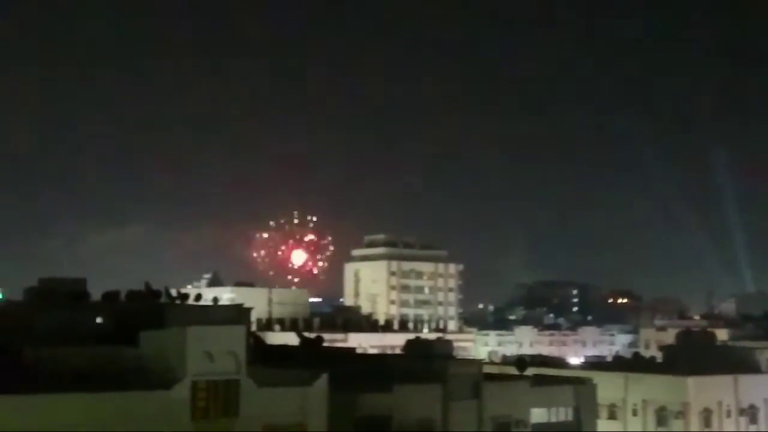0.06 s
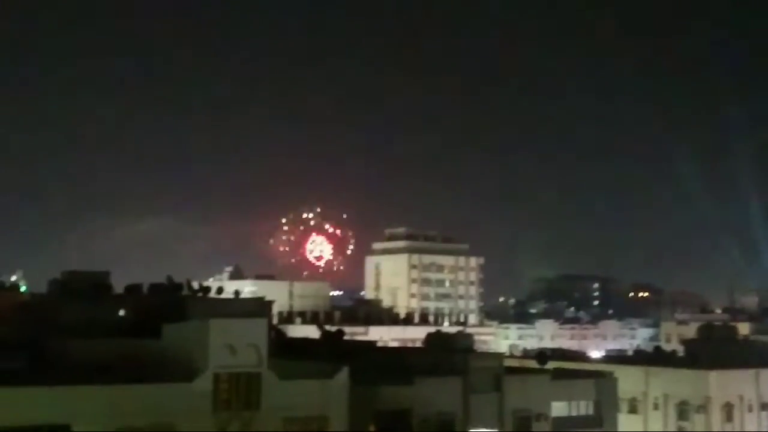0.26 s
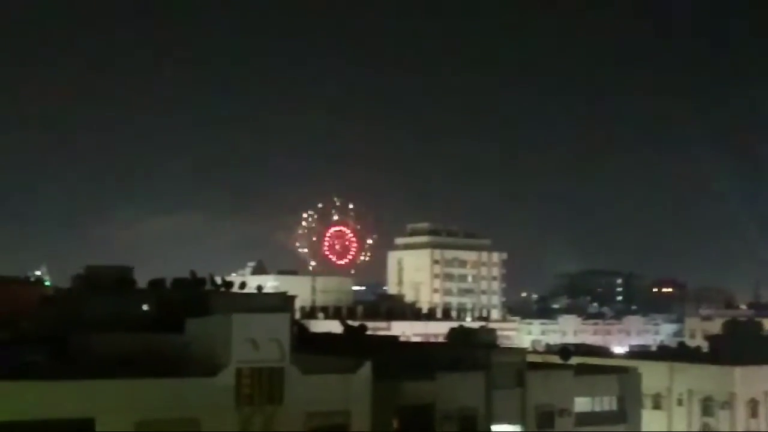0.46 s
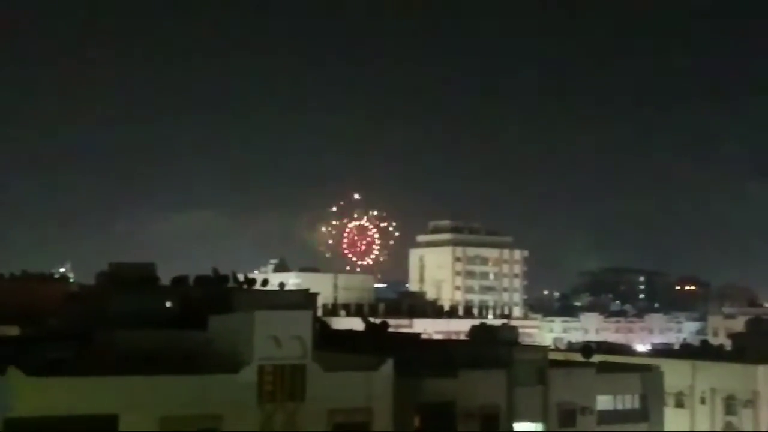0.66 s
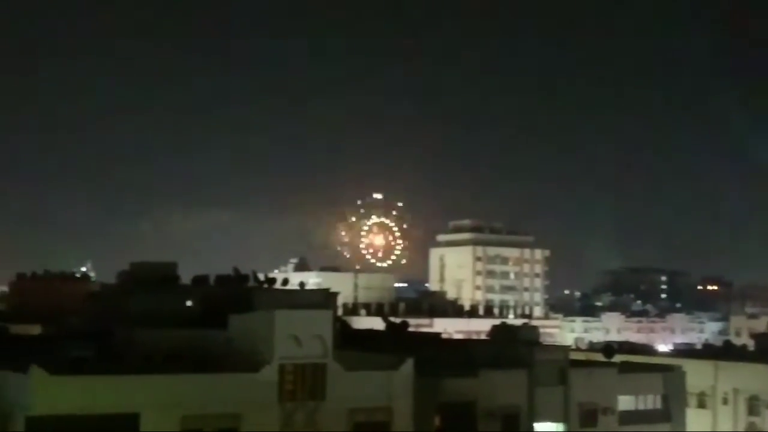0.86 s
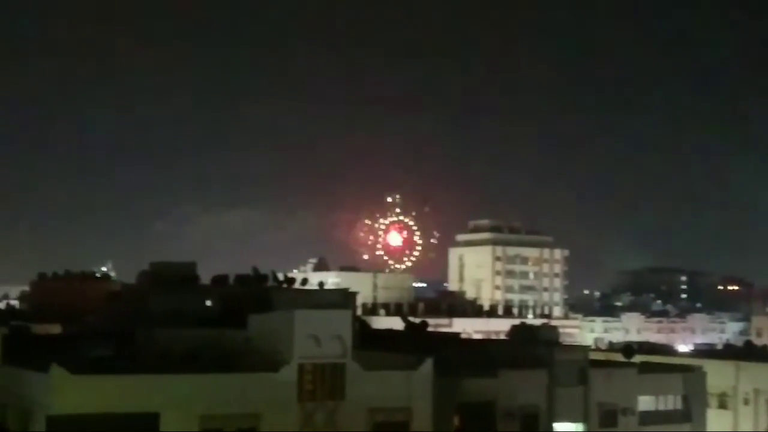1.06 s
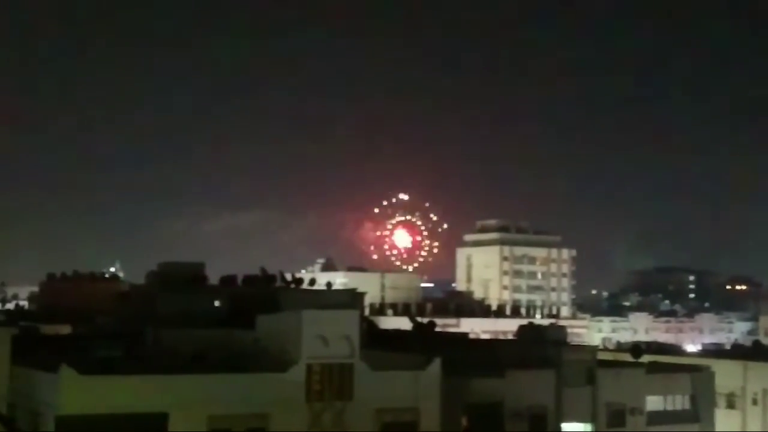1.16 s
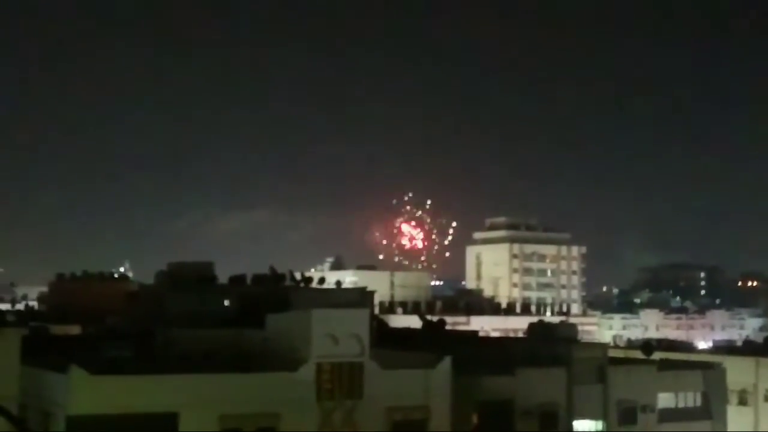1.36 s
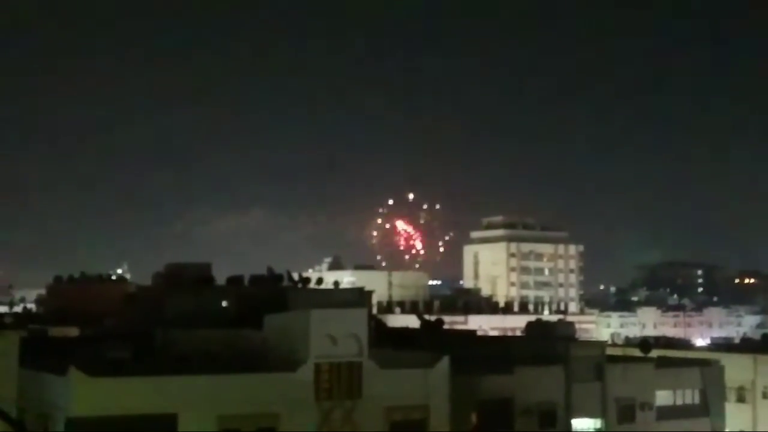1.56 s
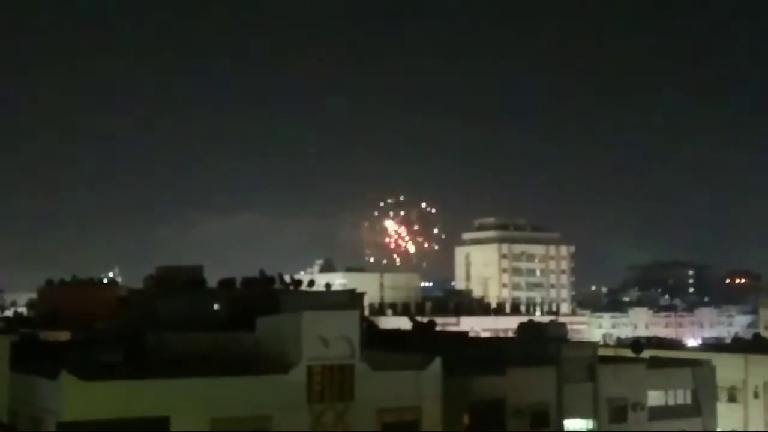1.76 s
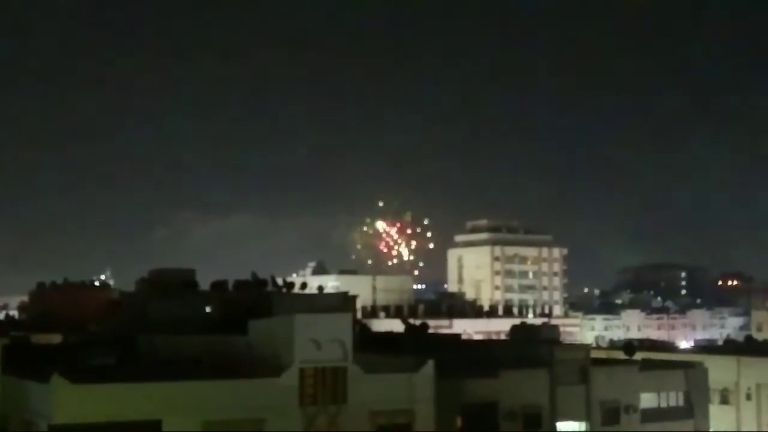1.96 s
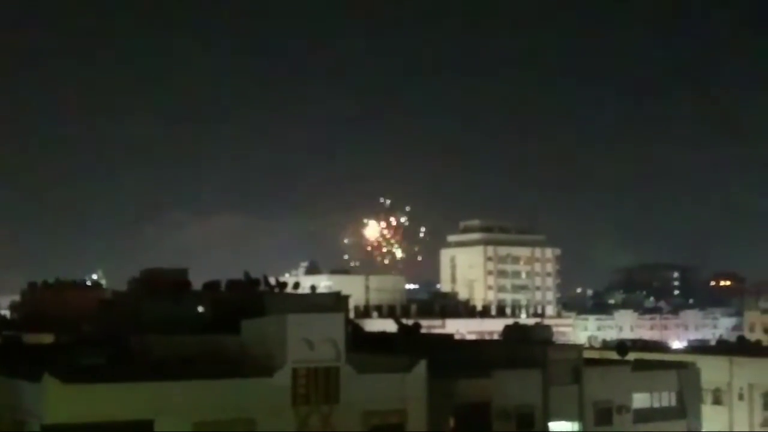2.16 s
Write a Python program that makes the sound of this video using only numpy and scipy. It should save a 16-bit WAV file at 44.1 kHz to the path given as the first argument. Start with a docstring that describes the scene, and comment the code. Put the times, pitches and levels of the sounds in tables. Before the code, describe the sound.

A dense cluster of far firework blasts, low and muffled with short crackle, eases into weaker pops and a few later thuds; building echoes blur together, captured by a small handheld microphone on an open rooftop.

```python
"""Fireworks burst far away over a city at night, heard from a rooftop. From the start filtered noise gives the
hum of the city and the hiss of the microphone. Then each blast, a pressure pulse, arrives as a dull crack with
roof and wall bounces and noisy crackle. Damped modes of the walled terrace boom after it over a quick higher
ring from the bounces, and decaying noise rolls away between the buildings. Among the blasts come small hollow
pops, short sines of wavering pitch."""
import sys
import numpy as np
from scipy import signal
from scipy.io import wavfile
from scipy.ndimage import uniform_filter1d

SR = 44100
rng = np.random.default_rng(int(sys.argv[2]) if len(sys.argv) > 2 else 0)


def gain_from_decibels(decibels):
    """Convert decibel values to linear amplitude factors."""
    exponent = np.asarray(decibels, float) / 20
    return 10 ** exponent


def persist_wave(psi):
    """Save psi, clipped to +-1, as 16-bit WAV."""
    counts = np.round(np.clip(psi, -1, 1) * 32767).astype(np.int16)
    wavfile.write(sys.argv[1], SR, np.atleast_2d(counts).T)


N = 97020  # length in samples

# Steady background spectrum, scaled as a whole later: frequency_hz, relative_density_db
CITY_SPECTRUM = [(25, -14), (43, -10), (106, -5.5), (198, -18), (238, -1.5), (270, -21.5), (409, -14),
                 (1170, -28.5), (2000, -29), (3200, -34.5), (5000, -37), (6300, -37.5), (8000, -48.5),
                 (10000, -49.5), (13000, -57), (15500, -48)]
# Background coherence between the ears: frequency_hz, left_right_likeness (0 to 1)
CITY_COHERENCE = [(60, 1), (250, 0.36), (700, 0.49), (2000, 0.06), (4000, 0.056), (12000, .05)]
# Background balance: frequency_hz, left_minus_right_db
CITY_BALANCE = [(60, -4), (500, -5), (5000, -2.5), (13000, -2)]
# Blasts: start_s, crack_db, crackle_db, boom_db, boom_tilt_db_per_octave, blast_length_s,
# roof_bounce_db, roll_db
BLASTS = [(0.2100, -27.5, -30, -22, 3.5, 0.00072, -1, -28),
          (0.2168, -12.5, -20.5, -17.5, 1.5, 0.00072, -1.5, -21),
          (0.4508, -8.5, -20, -10.5, -14, 0.00051, -32, -19),
          (0.5205, -12.5, -18.5, -13, 3, 0.00072, -15.5, -17),
          (0.5878, -13, -24, -14, 2, 0.0006, -11.5, -41.5),
          (0.7051, -31.5, -40, -25, -3, 0.0011, -25, -30.5),
          (0.8594, -13.5, -21, -16, -11, 0.00062, -18, -22.5),
          (0.9335, -20.5, -25, -32, 2, 0.00027, -17.5, -23),
          (0.9607, -4.5, -21.5, -12.5, 3, 0.00065, -4, -22),
          (1.114, -27, -40.5, -35.5, -9, 0.00085, -29, -41),
          (1.428, -60, -40.5, -29, -3.5, 0.001, -10, -33.5),
          (1.5275, -23.5, -30, -28, 2.5, 0.00071, -1.5, -20.5),
          (1.5548, -23.5, -33, -27, 2, 0.00067, 7, -37.5), (1.6146, -10.5, -43, -20, 1, 0.001, -27, -24.5),
          (1.882, -36, -40, -31, 5, 0.0016, -10, -33), (1.889, -18.5, -30, -20.5, 1, 0.0007, -23.5, -42),
          (1.9396, -33, -35.5, -44, 8, 0.00056, -1.5, -46)]
# Direct path (zero delay) and wall bounces: delay_s, left_db, right_db
WALL_PATHS = [(0, -2, 2.5), (.0021, -7.5, -6), (.0052, -11, -9.5), (.0074, -21, -8.5)]
# Ringing after each blast: the rows below 300 Hz are modes of the walled terrace, the rows above a comb from
# the quick bounces: frequency_hz, relative_level_db, t60_s, left_minus_right_db
BOOM_MODES = [(73.85, -1, 1, -5.5), (112.9, 1, 0.15, -5), (187.4, -11.5, 0.19, -1.5),
              (236.8, -12, 0.12, 1.5), (354.2, -21.5, 0.087, 8), (609, -12.5, 0.053, -2),
              (882, -30, 0.066, 4.5)]
# Spectrum of the street echoes, scaled to unit norm later: frequency_hz, relative_density_db
ROLL_SPECTRUM = [(30, -24), (60, 7), (92, 5), (178, -11), (278, -10.5), (400, -11.5), (600, -20),
                 (1200, -34), (3000, -52), (6000, -79)]
# Decay of the street echoes: frequency_hz, t60_s
ROLL_DECAY = [(60, 0.76), (150, 1), (400, 0.75), (1000, 0.84), (3000, 0.18)]
# Coherence of the street echoes between the ears: frequency_hz, left_right_likeness (0 to 1)
ROLL_COHERENCE = [(60, 1), (130, 0.93), (270, 1), (580, 0.42), (1230, 0.087), (2600, 0.13)]
# Balance of the street echoes: frequency_hz, left_minus_right_db
ROLL_BALANCE = [(60, -5), (125, -3.5), (250, -4.5), (600, -1.5), (2500, -2)]
# Small hollow pops without a boom: start_s, level_db, crackle_db, pitch_hz, roll_db
SMALL_POPS = [(0.5784, -33.5, -23, 453, -43.5), (0.773, -28.5, -35, 600, -29.5),
              (0.844, -21.5, -37, 458, -19.5), (1.1798, -28, -38, 473.4, -26.5),
              (1.213, -23.5, -34, 568, -36), (1.28, -21, -45, 477, -31), (1.3150, -25, -28, 540, -36),
              (1.851, -31, -38, 516, -24), (2.0300, -36.5, -39.5, 600, -32)]

CITY_DB = -44  # rms over both channels
SUCTION = 0.45  # smaller = deeper suction after the jump
RISE_SHARE = 0.35  # the air rounds the shock front, by this share of the blast length
AIR_HZ = 3600  # low-pass of the long way through the air
CRACKLE_LOW_HZ, CRACKLE_HIGH_HZ, CRACKLE_TOP_HZ = 600, 1204, 3330
CRACKLE_T60_S, CRACKLE_LIKENESS, CRACKLE_LEAN_DB = 0.06, 0.067, -1
ROOF_DELAY_S = 0.00076
FAR_WALL_DELAY_S, FAR_WALL_DB = 0.0765, -14.5  # echo from a facing building
FAR_WALL_HZ, FAR_WALL_Q = 1340, 1.1  # its ledges return a thin knock
BOOM_HOLD_S, BOOM_DROP_DB, BOOM_DROP_S = 0.058, -8, 0.0033  # extra drop after the hold
BOOM_DELAY_S, BOOM_LAG_CYCLES = 0.0021, 0.67  # deep modes peak this late, plus a share of a cycle
PROMPT_HZ = 300  # modes from here up peak after just one cycle
ROLL_DELAY_S, ROLL_PATCHY_DB = 0.018, 1.5  # the second is a standard deviation
GRAIN_HZ, GRAIN_S, GRAIN_DB = 350, 0.0055, 3  # high echoes arrive in grains; level deviation in dB
POP_RISE_S, POP_T60_S, POP_LEAN_DB = 0.0019, 0.013, -7
POP_WANDER = 0.25  # standard deviation of the pitch, as a share of it
LOW_CUT_HZ = 61.3


def read(points, hz):
    """Interpolation of a spectrum table along a logarithmic frequency axis."""
    table_hz, value = np.transpose(points)
    return np.interp(np.log(hz + 1), np.log(table_hz + 1), value)


def add(mix, start_s, sound):
    """Superposition: sound pressures add from the start time on."""
    part = mix[:, round(start_s * SR):][:, :sound.shape[-1]]
    part += sound[..., :part.shape[1]]


def lean(db):
    """Interaural level difference, split into left and right gains."""
    return np.array([[gain_from_decibels(db / 2)], [gain_from_decibels(-db / 2)]])


def noise(gain, likeness, lean_db, size):
    """Partly coherent stereo noise from random short-time spectra; gain is bins x frames."""
    a, b, c, d = rng.standard_normal((gain.shape[1], gain.shape[0], 4)).T
    likeness = np.clip(likeness, -1, 1)[:, None]
    left = a + 1j * b
    right = likeness * left + np.sqrt(1 - likeness ** 2) * (c + 1j * d)
    spectra = np.array([left * gain_from_decibels(lean_db / 2), right / gain_from_decibels(lean_db / 2)])
    _, sound = signal.istft(spectra * gain, nperseg=size, noverlap=size * 3 // 4)
    return sound[:, :N]


def city():
    """Stationary noise: many sources merge into the street hum, with microphone hiss."""
    hz = np.fft.rfftfreq(2048, 1 / SR)
    gain = gain_from_decibels(read(CITY_SPECTRUM, hz))[:, None] * np.ones(N // 512 + 5)
    out = noise(gain, read(CITY_COHERENCE, hz), read(CITY_BALANCE, hz)[:, None], size=2048)
    return gain_from_decibels(CITY_DB) * out / out.std()


def blast(length_s):
    """Blast wave: a pressure jump, then suction, rounded by the long way through the air."""
    t = np.arange(0, 0.03, 1 / SR)
    u = t / length_s
    pulse = (1 - u) * np.exp(-SUCTION * u - (u / 4) ** 2)
    rounding = u * np.exp(-u / RISE_SHARE)
    wave = np.convolve(pulse, rounding)[:len(t)]
    wave = signal.lfilter(*signal.butter(1, AIR_HZ, fs=SR), wave)
    return wave / wave.max()


def crackle(db):
    """Scattering: ragged decaying noise behind a report, nearly independent at each ear."""
    t = np.arange(0, 0.06, 1 / SR)
    # a random envelope shared by both ears makes the noise ragged
    a, b = rng.standard_normal((2, len(t))) * abs(rng.standard_normal(len(t)))
    right = CRACKLE_LIKENESS * a + np.sqrt(1 - CRACKLE_LIKENESS ** 2) * b
    pair = np.array([a, right]) * gain_from_decibels(db - 60 * t / CRACKLE_T60_S)
    band = signal.butter(1, (CRACKLE_LOW_HZ, CRACKLE_HIGH_HZ), "band", fs=SR)
    pair = signal.lfilter(*band, pair)
    top = signal.butter(4, CRACKLE_TOP_HZ, fs=SR, output="sos")
    return signal.sosfilt(top, pair) * lean(CRACKLE_LEAN_DB)


def cracks():
    """Specular reflection: each blast returns from roof, walls and a facing building; crackle is added."""
    out = np.zeros((2, N))
    ledges = signal.iirpeak(FAR_WALL_HZ, FAR_WALL_Q, SR)
    for start_s, crack_db, crackle_db, _, _, length_s, roof_db, _ in BLASTS:
        direct = gain_from_decibels(crack_db) * blast(length_s)
        # the roof throws the blast back first, more or less by the height of the burst
        wave = direct + gain_from_decibels(roof_db) * np.roll(direct, round(ROOF_DELAY_S * SR))
        for delay_s, left_db, right_db in WALL_PATHS:
            pair = wave * np.array([[gain_from_decibels(left_db)], [gain_from_decibels(right_db)]])
            add(out, start_s + delay_s, pair)
            echo = gain_from_decibels(FAR_WALL_DB) * signal.lfilter(*ledges, pair)
            add(out, start_s + delay_s + FAR_WALL_DELAY_S, echo)
        add(out, start_s, crackle(crackle_db))
    return out


def booms():
    """Modal resonance: the deep terrace modes swell up after each blast, the higher comb of the bounces rings
    at once; all decay exponentially."""
    out, t = np.zeros((2, N)), np.arange(0, 1, 1 / SR)
    drop = gain_from_decibels(BOOM_DROP_DB * np.clip((t - BOOM_HOLD_S) / BOOM_DROP_S, 0, 1))
    lowest_hz = BOOM_MODES[0][0]
    for hz, db, t60_s, lean_db in BOOM_MODES:
        peak_s = BOOM_DELAY_S + BOOM_LAG_CYCLES / hz if hz < PROMPT_HZ else 1 / hz
        swell = np.sin(np.pi / 2 * np.minimum(t / peak_s, 1)) ** 2
        wave = np.cos(2 * np.pi * hz * (t - peak_s))
        ring = gain_from_decibels(db - 60 * t / t60_s) * wave * swell * drop * lean(lean_db)
        for start_s, _, _, boom_db, tilt_db, *_ in BLASTS:
            add(out, start_s, gain_from_decibels(boom_db + tilt_db * np.log2(hz / lowest_hz)) * ring)
    return out


def roll():
    """Diffuse reverberation: countless street echoes, as noise that each burst starts, dying by band."""
    hz = np.fft.rfftfreq(1024, 1 / SR)
    t = np.arange(N // 256 + 5) * 256 / SR
    t60_s = read(ROLL_DECAY, hz)[:, None]
    power = 0
    for start_s, *_, roll_db in BLASTS + SMALL_POPS:
        age = t - start_s - ROLL_DELAY_S
        # decibels doubled, since powers add
        power = power + (age > 0) * gain_from_decibels(2 * roll_db - 120 * np.maximum(age, 0) / t60_s)
    # random level patches, smoothed over frequency, then time
    patches = rng.standard_normal((len(t), len(hz))).T
    patches = uniform_filter1d(uniform_filter1d(patches, 8, 0), 4, 1)
    patchiness = gain_from_decibels(ROLL_PATCHY_DB * patches / patches.std())
    colour = gain_from_decibels(read(ROLL_SPECTRUM, hz))
    colour = (colour / np.linalg.norm(colour))[:, None]
    gain = np.sqrt(power) * colour * patchiness
    out = noise(gain, read(ROLL_COHERENCE, hz), read(ROLL_BALANCE, hz)[:, None], size=1024)
    high_pass = signal.butter(2, GRAIN_HZ, "high", fs=SR, output="sos")
    high = signal.sosfiltfilt(high_pass, out)
    size = round(GRAIN_S * SR)
    grain = uniform_filter1d(uniform_filter1d(rng.standard_normal(N), size), size)
    return out - high + high * gain_from_decibels(GRAIN_DB * grain / grain.std())


def pops():
    """Damped oscillation: small far charges give a few hollow cycles and a little crackle."""
    out, t = np.zeros((2, N)), np.arange(0, 0.03, 1 / SR)
    envelope = gain_from_decibels(-60 * t / POP_T60_S) * (1 - np.exp(-t / POP_RISE_S))
    for start_s, db, crackle_db, pitch_hz, _ in SMALL_POPS:
        waver = uniform_filter1d(rng.standard_normal(len(t)), size=90)
        cycles = pitch_hz * np.cumsum(1 + POP_WANDER * waver / waver.std()) / SR
        ring = np.sin(2 * np.pi * cycles) * envelope
        add(out, start_s, gain_from_decibels(db) * ring / ring.max() * lean(POP_LEAN_DB))
        add(out, start_s, crackle(crackle_db))
    return out


def scene():
    """Superposition of all sources."""
    return city() + cracks() + booms() + roll() + pops()


def roll_off(x):
    """The treble ends steeply here."""
    return signal.sosfilt(signal.butter(12, 13600, fs=SR, output="sos"), x)


def record(dry):
    """High-pass response: a small microphone loses the deepest bass."""
    low_cut = signal.butter(4, LOW_CUT_HZ, "high", fs=SR, output="sos")
    mix = signal.sosfilt(low_cut, dry)
    return roll_off(mix)


dry = scene()
out = record(dry)
persist_wave(out)
```